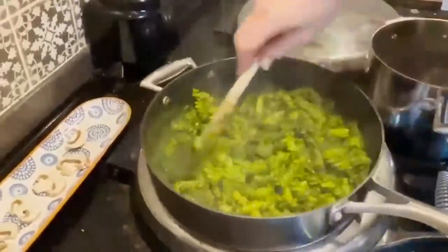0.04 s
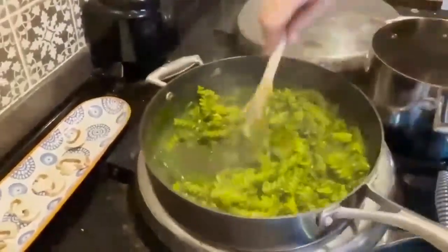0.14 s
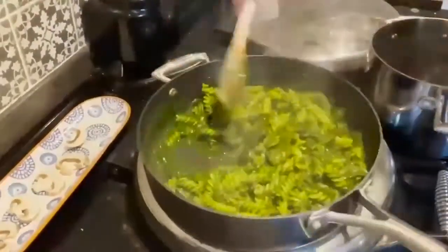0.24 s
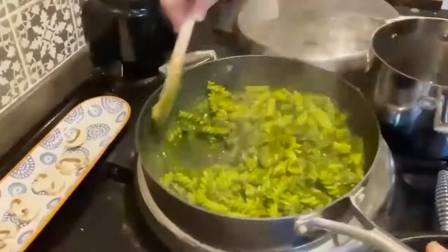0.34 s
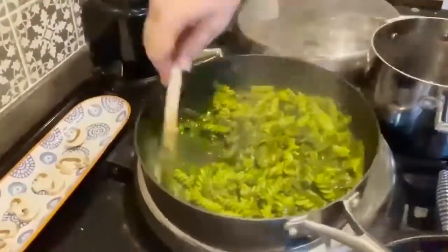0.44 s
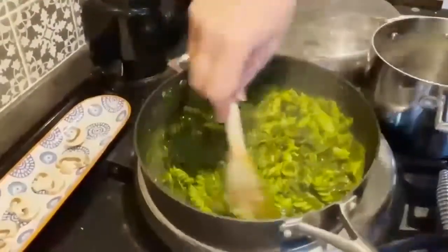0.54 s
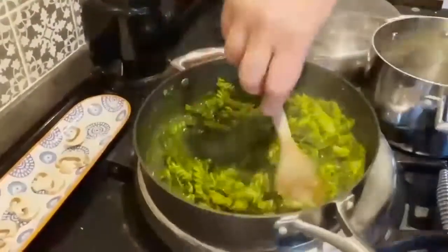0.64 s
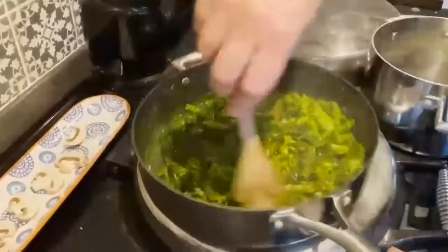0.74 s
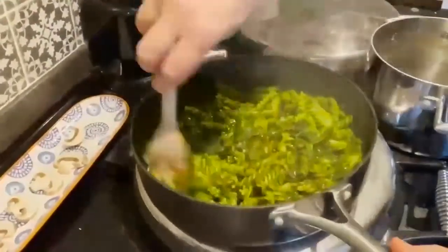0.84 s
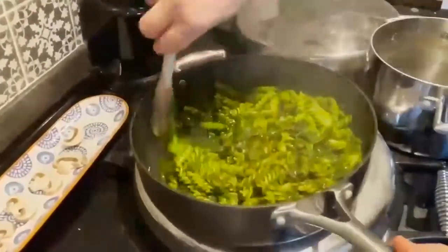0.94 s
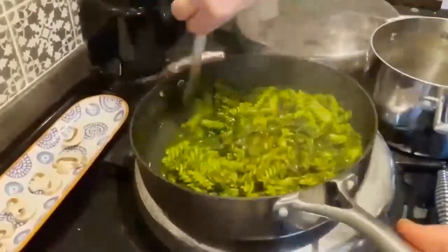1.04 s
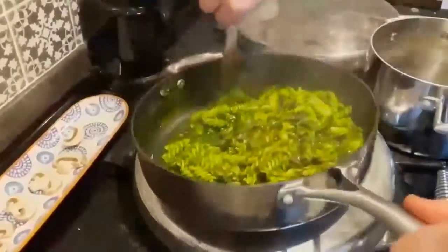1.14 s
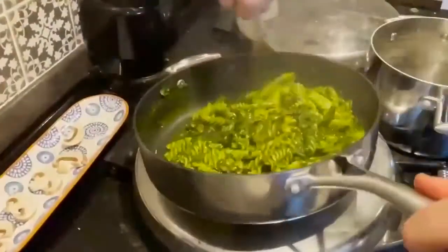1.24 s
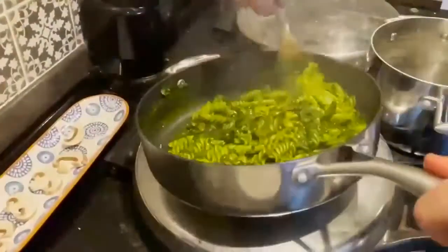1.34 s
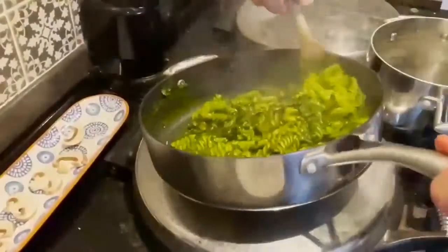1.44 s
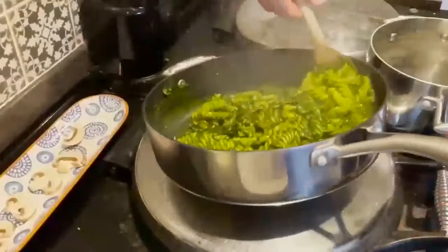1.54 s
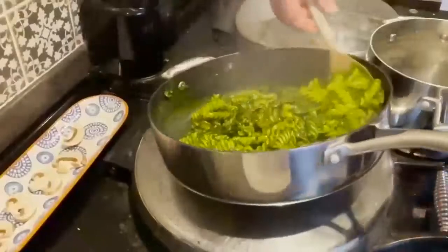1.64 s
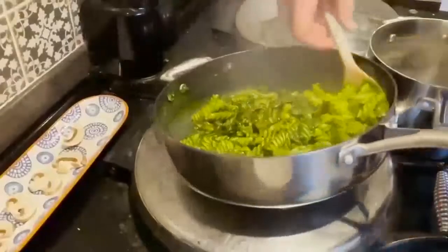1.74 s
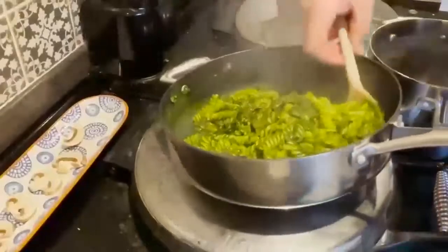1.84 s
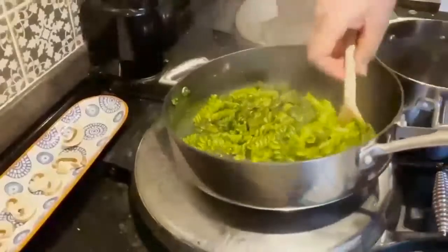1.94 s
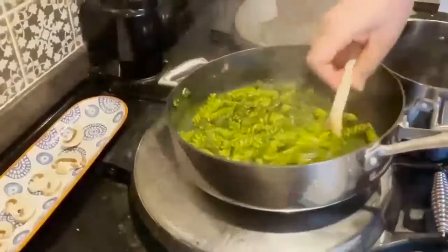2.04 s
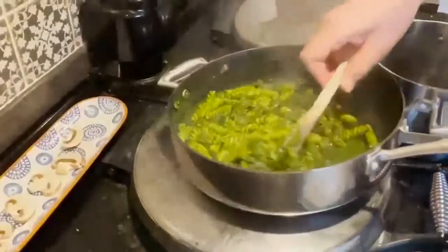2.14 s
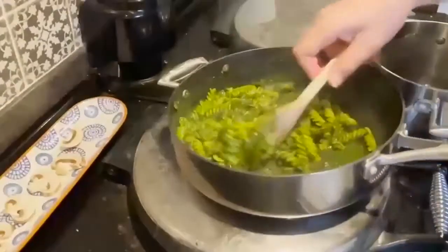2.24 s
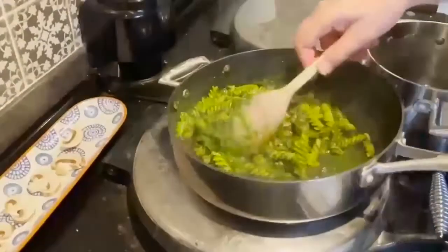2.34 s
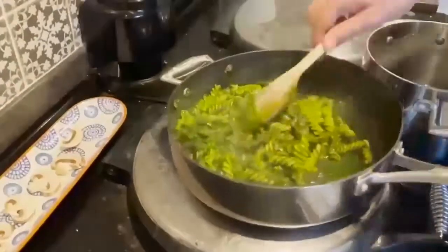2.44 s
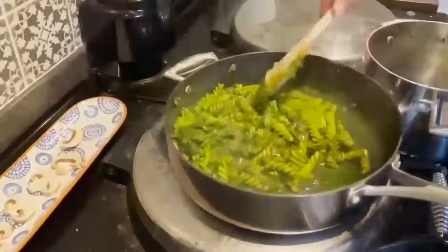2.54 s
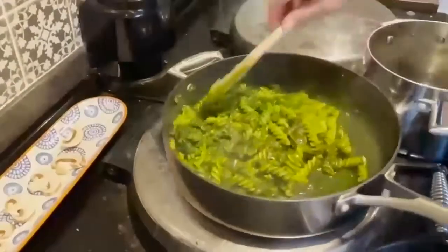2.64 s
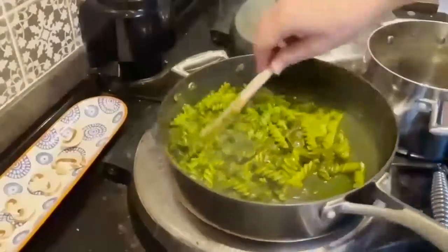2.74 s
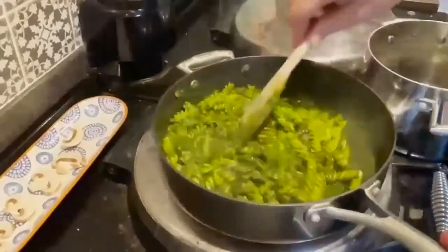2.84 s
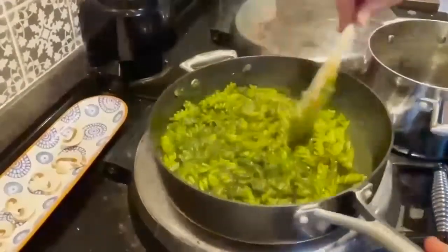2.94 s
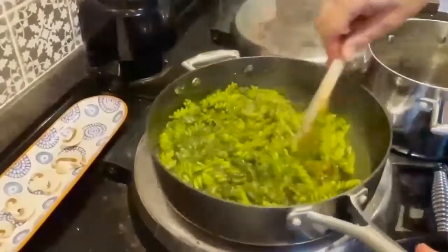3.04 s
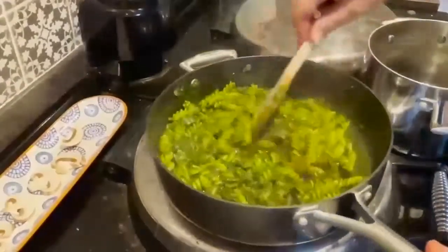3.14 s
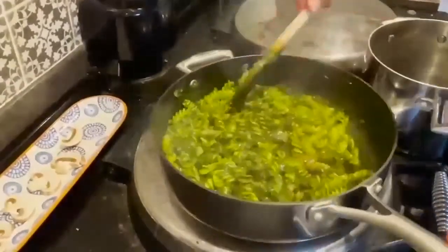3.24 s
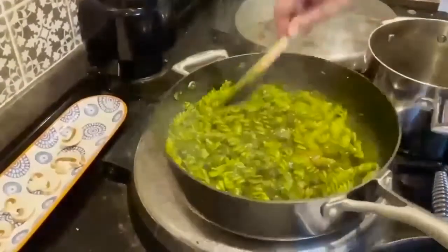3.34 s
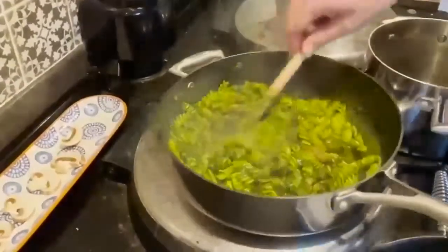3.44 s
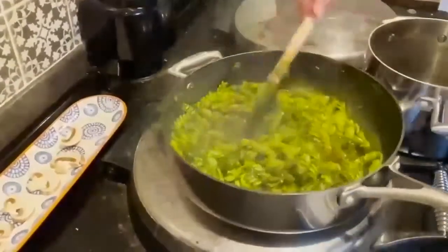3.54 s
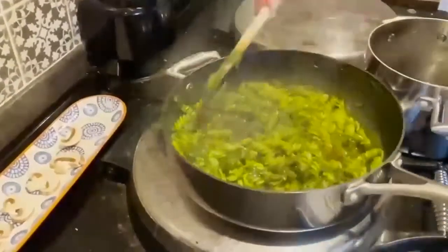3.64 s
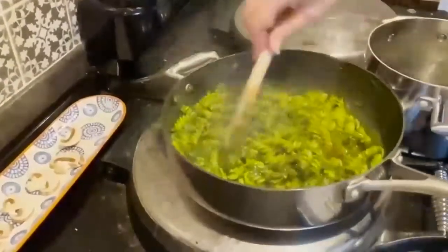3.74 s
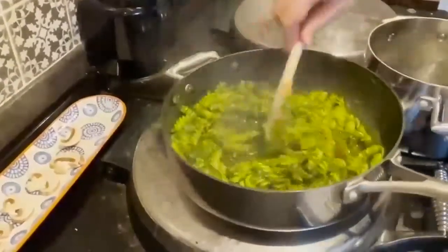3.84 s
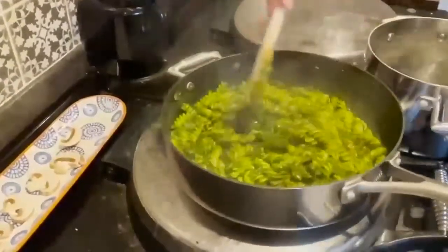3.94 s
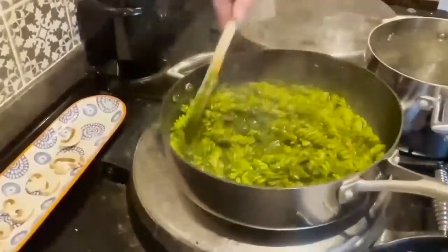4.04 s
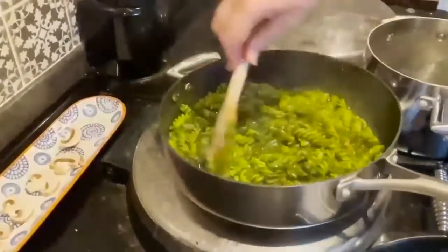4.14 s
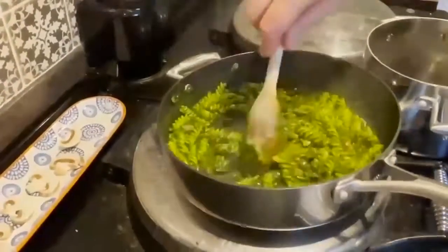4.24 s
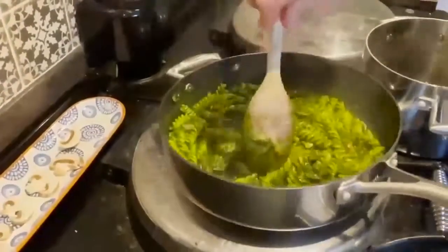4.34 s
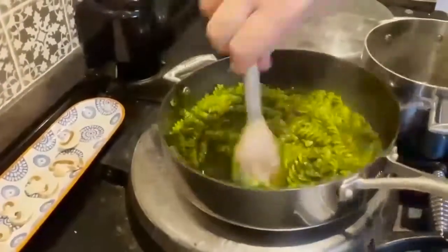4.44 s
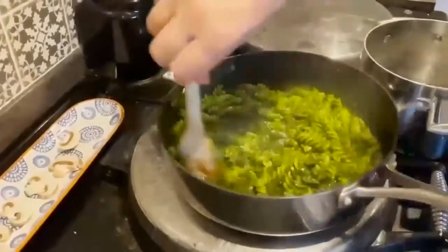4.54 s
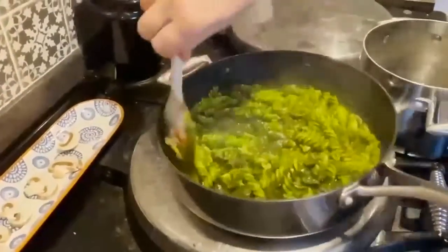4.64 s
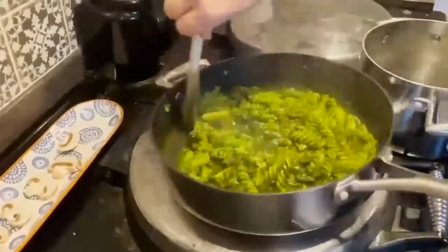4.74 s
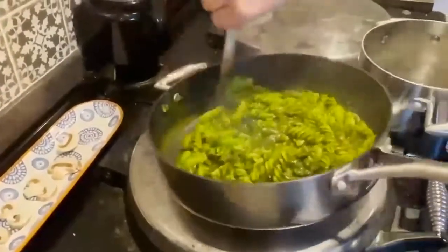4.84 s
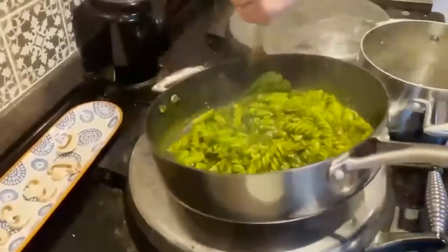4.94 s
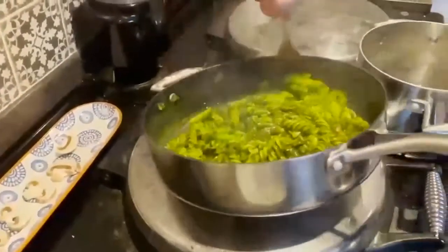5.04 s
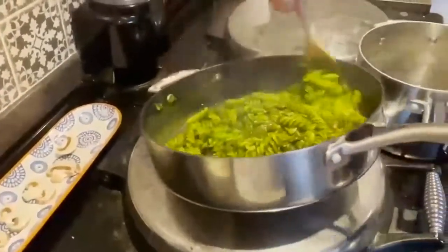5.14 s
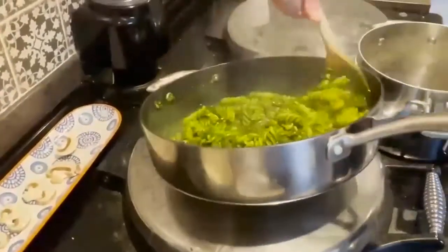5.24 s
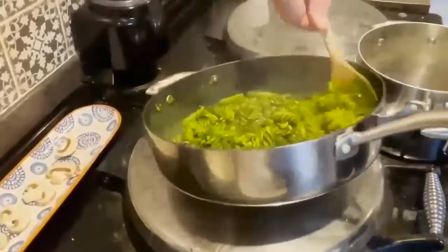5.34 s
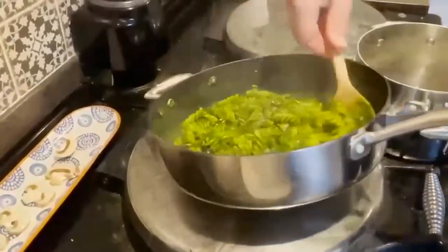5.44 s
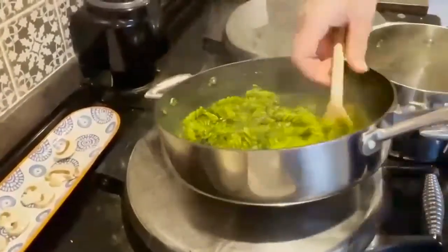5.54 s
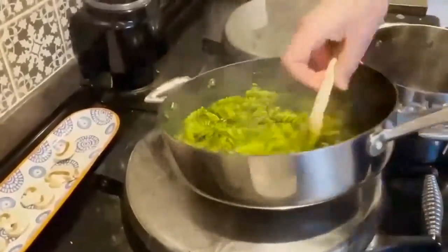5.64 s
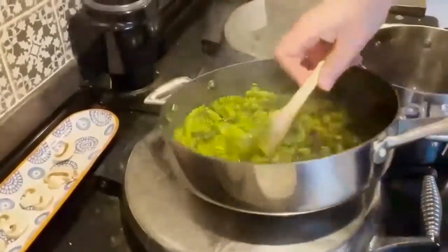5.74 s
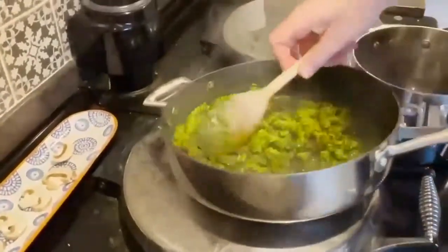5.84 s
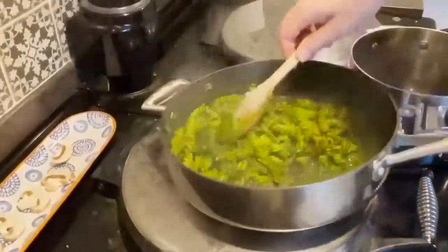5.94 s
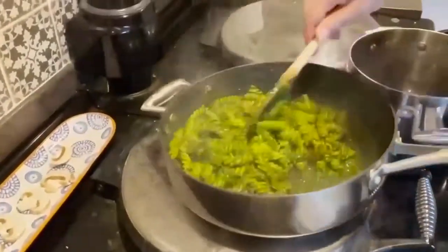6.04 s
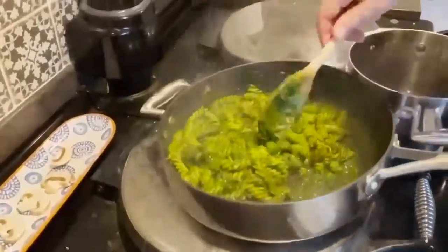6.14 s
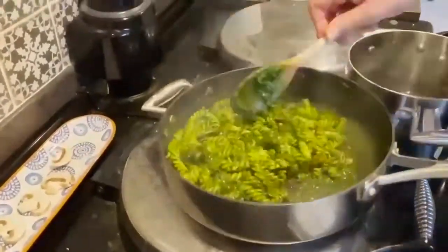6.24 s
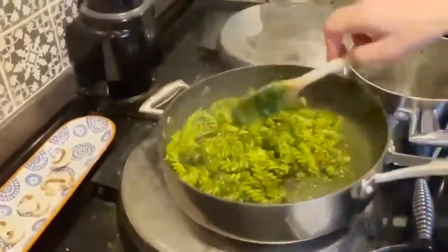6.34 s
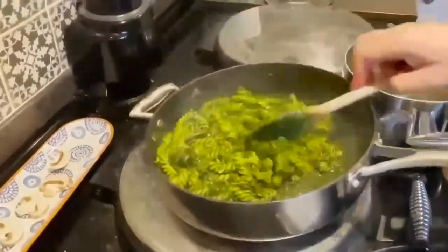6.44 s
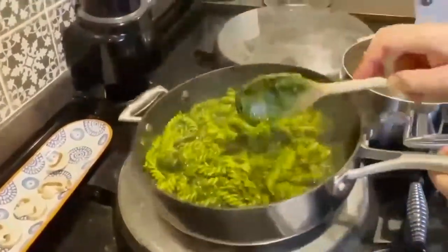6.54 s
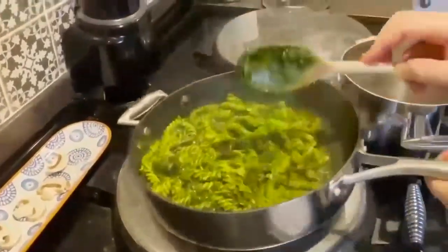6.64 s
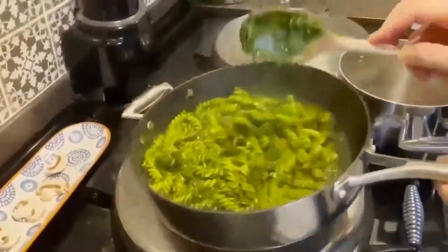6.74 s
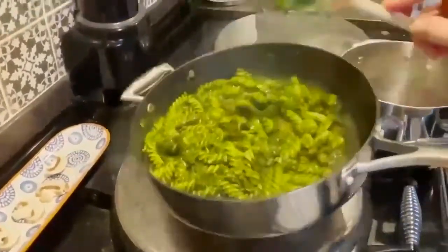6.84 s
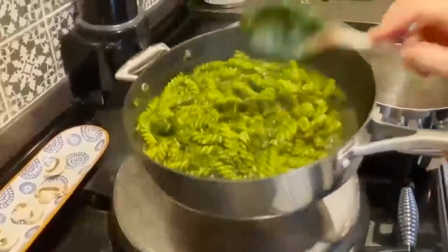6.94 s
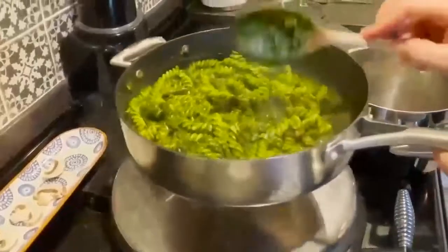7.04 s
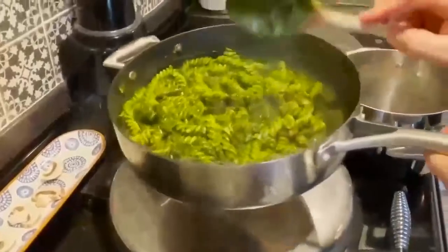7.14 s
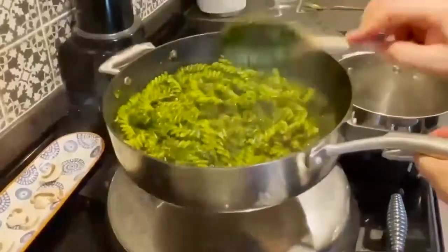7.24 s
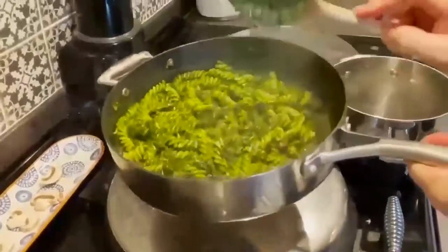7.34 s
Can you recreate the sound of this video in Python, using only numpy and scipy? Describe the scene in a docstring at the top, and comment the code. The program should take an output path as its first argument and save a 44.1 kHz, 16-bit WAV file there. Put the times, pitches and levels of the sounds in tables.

```python
"""A wooden spoon stirs sauced pasta in a steel pan: noise and damped grains make the hiss and squelch.
The spoon's scrapes are noise through the pan's modes; its knocks and two raps on the rim ring those modes.
Behind them lie grip noise of the hand on the phone, a humming appliance and the rumble of a small hard kitchen.
Two microphones a hand's width apart hear it all in stereo."""
import sys
import numpy as np
from scipy import signal
from scipy.fft import rfft, irfft, next_fast_len
from scipy.io import wavfile
from scipy.ndimage import uniform_filter1d, map_coordinates

SR = 44100
rng = np.random.default_rng(int(sys.argv[2]) if len(sys.argv) > 2 else 0)


def store_wav(level_fs):
    """Save 16-bit WAV to argv[1]."""
    pcm = np.round(np.clip(np.atleast_2d(level_fs), -1, 1) * 32767)
    wavfile.write(sys.argv[1], SR, pcm.T.astype(np.int16))


N = 325017

# Background hum of the appliance: (frequency [Hz], nominal rms level [dB])
HUM_PARTIALS = [(49.4, -43.5), (98.8, -67)]
# Spectrum of the kitchen rumble: (frequency [Hz], relative level [dB])
AIR_SPECTRUM = [(35, -1.5), (60, 1.5), (78, -6), (102, -22), (141, -14.5), (235, -11), (706, -36),
                (2000, -32.5), (4400, -120)]
# Likeness of left and right in diffuse sound: (frequency [Hz], correlation [1])
STEREO_LIKENESS = [(60, 0.71), (200, 0.68), (640, 0.022), (3000, 0.014), (6500, 0.47), (9000, 1),
                   (15000, 0.91)]
# Reverberation of the kitchen: (frequency [Hz], time to fall 60 dB [s])
ROOM_DECAY = [(150, 0.35), (1000, 0.48), (4000, 0.35), (12000, 0.058)]

# Grip noise of the hand on the phone: (time [s], nominal rumble level [dB])
GRIP_LEVELS = [(0.0, -58.5), (0.3, -67.5), (1.17, -70), (2.05, -53.5), (2.4, -76), (4.2, -59.5),
               (4.4, -51.5), (4.65, -59), (5.3, -59.5), (6.3, -58), (7.37, -62.5)]
# Jolts of the case by the hand: (start [s], rise [s], hold [s], nominal rumble level [dB])
CASE_JOLTS = [(5.416, 0.0073, 0.0074, -47), (5.57, 0.026, 0.0077, -42.5), (5.756, 0.023, 0.022, -33),
              (5.824, 0.014, 0.042, -30.5), (5.895, 0.0074, 0.079, -46), (6.133, 0.0078, 0.023, -42)]
# A finger sliding over the case: (start [s], rise [s], hold [s], nominal level [dB])
FINGER_RUBS = [(5.81, 0.029, 0.0055, -41.5)]
# Spectrum of the grip noise: (frequency [Hz], relative level [dB])
GRIP_SPECTRUM = [(24, -71), (40, -4), (75, 8.5), (281, -8), (368, -13.5), (589, -23), (1200, -82)]
# Rocking of the case in the hand: (frequency [Hz], width [Hz], relative level [dB])
CASE_MODES = [(68.9, 7.9, 6)]

# Blows of spoon on pan: (time [s], clack peak before stereo balance [dB], thud near 200 Hz [dB],
# body near 450 Hz [dB], edge above 1.6 kHz [dB], room [dB], share of free ring time left by the food [1])
SPOON_KNOCKS = [(0.2, -50.5, -9, -29, -5, -4, 0.27), (0.363, -70, 24, 15, -5, 1, 0.34),
                (1.013, -32.5, -10.5, 5, -3.5, -5.5, 0.41), (1.135, -39.5, 3.5, 4, 2.5, -2.5, 0.54),
                (1.306, -54.5, 9, 10, -16, 2, 0.21), (2.701, -51, -1, 5.5, 5, -6, 0.49),
                (3.353, -24, -54, 9, -16.5, -7.5, 0.32), (3.761, -47, -8, 21.5, -22, -4.5, 0.27),
                (4.115, -49, 9, -31, 28, -8.5, 0.18), (4.415, -22, -20, 2, 15, -10, 0.25),
                (4.423, -39, 5.5, 15, 7, -4.5, 0.6), (4.705, -26, -13.5, 1.5, -3.5, -5.5, 0.42),
                (5.59, -60.5, 13, 17.5, -16, -9, 0.69), (5.75, -34, -1, -4.5, -23, -7, 0.34),
                (5.81, -29.5, -12, -13, 3.5, -14, 0.57), (5.832, -29.5, 0, 0, -10, -15.5, 0.54),
                (6.144, -59.5, 13, 18, 15, 0.5, 0.36), (6.949, -11, -10.5, -7, -4.5, -5.5, 0.26),
                (6.9599, -16, -17.5, -17.5, -16, -6.5, 0.61), (7.173, -9, -7, -10, -4.5, -7, 0.23),
                (7.1826, -16, -15, -14, -19, -5.5, 0.83)]
# Modes of the steel pan: (frequency [Hz], relative level [dB], free time to fall 60 dB [s])
PAN_MODES = [(206.6, 5.5, 0.32), (347.6, 6.5, 0.17), (470, 5.5, 0.11), (546, 3, 0.13), (673, 0, 0.14),
             (822, -1, 0.12), (933, 1, 0.12), (1077, 0, 0.11), (1146, -4.5, 0.26), (1262, -4.5, 0.29),
             (1349, -14, 0.32), (1437, -10, 0.15), (1620, -9.5, 0.38), (1841, -12.5, 0.33),
             (2053, -16, 0.33), (2203, -13, 0.32), (3300, -20.5, 0.25), (3957, -22.5, 0.2),
             (4140, -29, 0.2)]
# Modes of the wooden spoon: (frequency [Hz], width [Hz], relative level [dB])
SPOON_MODES = [(560, 115, -6), (1213, 247, 7), (1847, 101, 18), (3145, 730, 14.5), (4220, 490, 13.5),
               (5060, 1250, 7.5)]
# Single pan modes that sing under a firm drag: (start [s], hold [s], nominal level [dB], pitch [Hz])
STEEL_SINGS = [(0.837, .09, -53, 925), (0.88, 0.11, -54, 1444), (0.87, 0.13, -51.5, 1820),
               (1.165, 0.095, -57.5, 1740), (1.33, 0.1, -62, 1060), (1.787, 0.11, -68.5, 1130),
               (4.63, 0.072, -52.5, 1845)]

# Spoon strokes through the food:
# (start [s], rise [s], hold [s], nominal hiss [dB], nominal squelch [dB], nominal scrape [dB])
SPOON_STROKES = [(0.0, 0.00095, 0.11, -63, -63, -66.5), (0.354, 0.021, 0.012, -59, -66, -60.5),
                 (0.437, 0.059, 0.035, -57.5, -58, -54), (0.683, 0.094, 0.031, -57.5, -57, -54.5),
                 (0.826, 0.031, 0.084, -58.5, -56.5, -56.5), (1.04, 0.1, 0.022, -59, -60.5, -61),
                 (1.238, 0.016, 0.028, -61, -61, -56.5), (1.323, 0.023, 0.43, -70.5, -78, -61),
                 (1.878, 0.039, 0.5, -71.5, -78.5, -75), (2.651, 0.0088, 0.11, -63, -60, -65),
                 (2.963, 0.01, 0.11, -65.5, -62.5, -67), (3.316, 0.022, 0.09, -64, -56, -57),
                 (3.721, 0.0056, 0.053, -57, -54, -64.5), (4.1, 0.021, 0.012, -57, -54.5, -58),
                 (4.177, 0.073, 0.14, -68, -72.5, -59), (4.401, 0.0059, 0.33, -58.5, -59, -55),
                 (4.8, 0.021, 0.18, -73.5, -76, -62), (5.046, 0.056, 0.14, -65, -68, -58.5),
                 (5.277, 0.053, 0.28, -66, -71.5, -63), (5.676, 0.018, 0.1, -61.5, -69, -62),
                 (5.782, 0.022, 0.013, -50.5, -47, -56.5), (5.94, 0.034, 0.28, -60.5, -67, -66),
                 (6.323, 0.031, 0.11, -60.5, -62.5, -57), (6.41, 0.013, 0.27, -70.5, -70.5, -65)]
# Wet pops of the food: (time [s], nominal size of first bubble [dB], its pitch [Hz])
WET_POPS = [(0.377, -37, 4270), (0.5338, -36, 3000), (0.629, -38.5, 2340), (1.163, -21.5, 8450),
            (1.1776, -33.5, 3030), (1.266, -42, 2980), (1.6587, -43.5, 3240), (2.1805, -50, 2130),
            (2.2137, -48, 1850), (2.2783, -47, 2590), (2.434, -39.5, 2800), (2.4813, -45, 4170),
            (2.658, -37.5, 2410), (2.682, -38.5, 2580), (2.724, -38, 2630), (2.7657, -32.5, 3770),
            (2.812, -50, 1860), (2.796, -42, 4320), (2.845, -38.5, 2780), (2.974, -53, 1590),
            (3.009, -36, 2300), (3.028, -32.5, 1860), (3.093, -40.5, 2720), (3.111, -35, 3330),
            (3.411, -48, 3900), (3.734, -24, 4770), (5.69, -40, 2420), (5.852, -41, 3200),
            (5.8833, -33, 5040), (6.3529, -30, 3900)]
# Fine spits of sauce: (time [s], nominal level [dB], pitch [Hz])
SAUCE_TICKS = [(0.152, -58, 10500), (1.65, -49, 12900), (3.4602, -49.5, 9000)]
# Spectrum of the steam: (frequency [Hz], relative level [dB])
HISS_SPECTRUM = [(880, -66.5), (1500, -8), (1720, -52), (1880, 8), (2910, -19.5), (3450, 5.5), (4120, 7.5),
                 (5540, 2), (6180, 8.5), (7460, 2.5), (13500, -1), (16000, -9)]

TOP_HZ = 15800  # band limit of the phone
LAG_S = 0.00007  # direct sound reaches the right microphone this much later
RISE_DB = 13  # climbed by a gesture during its rise
HISS_FALL, SQUELCH_FALL, SCRAPE_FALL = 118, 270, 61  # after a stroke, dB per s
GRIP_FALL, RUB_FALL, SING_FALL = 200, 550, 520  # after a jolt, a rub or a singing drag, dB per s
BUILD_CYCLES = 1  # time constant of a mode's build-up, in cycles
SCATTER_DB = 1.5  # standard deviation of each mode's level from blow to blow
WANDER = 0.8  # phase flutter that roughens a ring: radians for a mode at 1800 Hz
EDGE_GROWS = 1.47  # factor on the edge dB at 5 kHz: a hard knock's edge gains, a soft one's fades
REBOUND_S, REBOUND_DB = 0.0026, -8  # the spoon touches a second time
JAR_DB, JAR_HZ, JAR_S = -13, 86.5, 0.0063  # worktop thud: dB under peak plus thud, pitch, swell time
SING_RISE_S, SING_WAVER, SING_GRIT = 0.02, 0.03, 170  # rise; pitch scatter as a share; stutter knots per s
HISS_REST_DB, SQUELCH_REST_DB = -79.5, -83  # nominal levels of the food left alone
SHAKE_HISS_DB, SHAKE_FALL = -42.5, 253  # steam shaken loose by a knock: dB re its peak; dB per s
TICK_GAIN_DB = 15  # level of the ticks above their nominal dB, before the soft start
WET_ROOM_DB = -12  # the kitchen's answer to the food


def amp(db):
    """Decibel law: level to amplitude ratio."""
    return 10 ** (np.asarray(db) / 20)


def unit(x):
    """Normalization to unit rms."""
    return x / np.sqrt(np.mean(x ** 2) + 1e-20)


def along(points, hz):
    """Linear interpolation of (frequency, value) points on a logarithmic frequency axis."""
    f, v = np.transpose(points)
    return np.interp(np.log(hz + 1), np.log(f + 1), v)


def curves(rows):
    """Linear interpolation in time of each level column; minus infinity, or silence, outside."""
    s, *cols = np.transpose(rows)
    return [np.interp(np.arange(N) / SR, s, c, -np.inf, -np.inf) for c in cols]


def wobble(rate):
    """Band-limited fluctuation: a smooth random curve through rate knots a second."""
    knots = rng.standard_normal(int(N * rate / SR) + 4)
    return map_coordinates(knots, [np.arange(N) * rate / SR])


def swells(start, rise, hold, db, fall):
    """Envelopes that rise, hold and fall exponentially; overlapping ones add in power."""
    clock = np.arange(0, N / SR + 0.002, 0.001)
    t = clock[:, None] - start
    climb_db = RISE_DB * np.clip(1 - t / np.abs(rise), 0, None)
    drop_db = fall * np.clip(t - rise - hold, 0, None)
    gain = np.linalg.norm(amp(db - climb_db - drop_db), axis=1)
    return np.interp(np.arange(N) / SR, clock, gain)


def filtered(x, response):
    """Linear filtering: the spectrum of x times a complex frequency response."""
    m = next_fast_len(x.shape[-1] + SR // 4)
    spectrum = rfft(x, m) * response(np.fft.rfftfreq(m, 1 / SR))
    return irfft(spectrum, m)[..., :x.shape[-1]]


def resonances(table):
    """Modal superposition: causal second-order resonances of alternating sign."""
    def response(f):
        return sum((-1) ** k * amp(db) * 1j * f * width / (hz * hz - f * f + 1j * f * width)
                   for k, (hz, width, db) in enumerate(table))
    return response


def rush(gain, patchy_db):
    """Diffuse field: stereo noise of unit rms, patchy in time and frequency, with a set correlation."""
    z = signal.stft(rng.standard_normal((2, N)), nperseg=512)[2]
    field = uniform_filter1d(rng.standard_normal(z.shape[1:]), 8, 0)
    field = uniform_filter1d(field, 6, 1)
    pair = signal.istft(z * amp(patchy_db * unit(field)), nperseg=512)[1][:, :N]

    def mid_side(hz):
        # the correlation of left and right is the cosine of twice this angle
        angle = np.arccos(np.clip(along(STEREO_LIKENESS, hz), -1, 1)) / 2
        return gain(hz) * np.array([np.cos(angle), np.sin(angle)])

    mid, side = filtered(pair, mid_side)
    return unit(np.array([mid + side, mid - side]))


def grains(start, hz, cycles, gain):
    """Damped oscillation: soft-starting sines that lose 40 dB in the given cycles, summed."""
    k = np.arange(SR // 100)
    turns = k * hz[:, None] / SR
    envelope = amp(-40 * turns / cycles) * (1 - np.exp(-turns))
    wave = gain[:, None] * np.sin(2 * np.pi * turns) * envelope
    return np.bincount((start[:, None] + k).ravel(), wave.ravel(), N + len(k))[:N]


def crackle(count, centre_hz, spread, cycles, spike_db):
    """Shot noise: random grains of log-normal pitch and size, unit rms."""
    hz = np.clip(centre_hz * np.exp(spread * rng.standard_normal(count)), 300, 15000)
    size = amp(spike_db * rng.standard_normal(count).clip(-2, 2))
    return unit(grains(rng.integers(0, N, count), hz, cycles, size))


def tail():
    """Reverberation: stereo noise of unit energy a side, each frequency decaying at its own rate."""
    hz, t, z = signal.stft(rng.standard_normal((2, SR // 2)), SR, nperseg=256)
    decay = amp(-60 * t / along(ROOM_DECAY, hz)[:, None])
    answer = signal.istft(z * decay, SR, nperseg=256)[1]
    answer = answer / np.linalg.norm(answer, axis=1, keepdims=True)
    return np.pad(answer, ((0, 0), (120, 0)))  # the answer starts 120 samples late


def heard(x, left_db):
    """Arrival-time and level difference: direct sound is earlier and stronger on the left."""
    def lead(hz):
        return np.exp(1j * np.pi * hz * LAG_S * np.array([[1], [-1]]))
    return filtered(np.array([x, x]), lead) * amp([[left_db], [-left_db]])


def kitchen():
    """Steady tones and diffuse noise: a hum wavering in pitch and level over a faint rumble."""
    t = np.arange(N) / SR + 0.00016 * wobble(2.3)
    hum = sum(np.sqrt(2) * amp(db + 0.78 * wobble(4.8)) * np.sin(2 * np.pi * hz * t)
              for hz, db in HUM_PARTIALS)
    rumble = rush(lambda hz: amp(along(AIR_SPECTRUM, hz)), patchy_db=2.0)
    return hum * amp([[-1.1], [1.1]]) + amp(-61.5) * rumble


def hand():
    """Structure-borne noise: grip rumble through the case, partly correlated and stronger on the left."""
    lumps = amp(3 * np.array([wobble(40), wobble(40)]))
    shared, *own = rng.standard_normal((3, N))

    def case(hz):
        return amp(along(GRIP_SPECTRUM, hz)) * (1 + 0.66 * np.abs(resonances(CASE_MODES)(hz)))

    thumps = unit(lumps * filtered(0.79 * shared + own, case))
    grip = amp(curves(GRIP_LEVELS)[0]) + swells(*np.transpose(CASE_JOLTS), GRIP_FALL)
    rub_modes = [(14000, 1900, 1.3), (4500, 4100, 1.5)]  # (frequency [Hz], width [Hz], level [dB])
    slide = unit(filtered(rng.standard_normal(N), resonances(rub_modes)))
    rub = swells(*np.transpose(FINGER_RUBS), RUB_FALL) * amp(4.8 * wobble(90))
    return grip * amp([[3], [-2]]) * thumps + rub * slide


def pan_ring(t, colour, free):
    """Free vibration: decaying pan modes with fluttering phase, unlike in the two microphones."""
    ring = np.zeros((2, len(t)))
    for hz, level, t60 in PAN_MODES:
        phase = rng.uniform(0, 3.37) + min(hz / 900, 1.6) * rng.standard_normal((2, 1))
        flutter = np.interp(t, np.linspace(0, t[-1], 60), rng.standard_normal(60))
        flutter = WANDER * min(hz / 1800, 2) * flutter
        decay_db = 60 * t / (t60 * max(free, 0.03))
        gain = amp(colour(hz) + level + SCATTER_DB * rng.normal() - decay_db)
        build = 1 - np.exp(-t * hz / BUILD_CYCLES)
        ring += gain * np.sin(2 * np.pi * hz * t + phase + flutter) * build
    return ring


def spoon_clack(t, colour):
    """Impulse response: a short rounded push excites the wood, then a rebound; unit peak."""
    push = np.exp(-t / 0.00028) * t
    modes = [(hz, width, level + colour(hz)) for hz, width, level in SPOON_MODES]
    clack = filtered(push, resonances(modes))
    clack = clack + amp(REBOUND_DB) * np.pad(clack, (round(REBOUND_S * SR), 0))[:len(t)]
    return clack / np.abs(clack).max()


def knocks():
    """Impact excitation: each blow clacks the spoon, rings the pan, jars the worktop and fills the room."""
    clacks, rings = np.zeros(N + SR), np.zeros((2, N + 2 * SR))
    t = np.arange(SR // 2) / SR
    swell = t / JAR_S * np.exp(1 - t / JAR_S)
    for s, db, thud_db, body_db, edge_db, room_db, free in SPOON_KNOCKS:
        shape = [(200, thud_db), (450, body_db), (1250, 0.0064), (1600, edge_db), (2300, edge_db),
                 (5000, EDGE_GROWS * edge_db)]

        def colour(hz):
            return along(shape, hz)

        ring = amp(db - 8) * pan_ring(t, colour, free)
        clack = amp(db) * spoon_clack(t, colour)
        jar = amp(db + thud_db + JAR_DB) * swell * np.sin(2 * np.pi * JAR_HZ * t)
        echo = signal.fftconvolve(clack + ring, tail(), axes=1)
        first = round(s * SR)
        clacks[first:][:len(t)] += clack
        rings[:, first:][:, :len(t)] += ring + jar
        rings[:, first:][:, :echo.shape[1]] += amp(room_db) * echo
    return heard(clacks[:N], left_db=4.0) + rings[:, :N] * amp([[0.6], [-0.6]])


def stirring():
    """Common excitation: hiss, squelch and scrape gains of the strokes; knocks also shake the hiss."""
    start, rise, hold, hiss_db, squelch_db, scrape_db = np.transpose(SPOON_STROKES)
    s, db = np.transpose(SPOON_KNOCKS)[:2]
    shaken = swells(s, 0.00095, 0.002, db + SHAKE_HISS_DB, SHAKE_FALL)
    hiss = amp(HISS_REST_DB) + swells(start, rise, hold, hiss_db, HISS_FALL) + shaken
    squelch = amp(SQUELCH_REST_DB) + swells(start, rise, hold, squelch_db, SQUELCH_FALL)
    return hiss, squelch, swells(start, rise, hold, scrape_db, SCRAPE_FALL)


def singing():
    """Stick-slip friction feeds one mode: pitch strays, strength stutters unlike in the two microphones."""
    sound = np.zeros((2, N))
    for s, hold, db, hz in STEEL_SINGS:
        phase = 2 * np.pi * hz * np.cumsum(1 + SING_WAVER * wobble(25)) / SR
        stutter = np.array([wobble(SING_GRIT) * np.sin(phase) + wobble(SING_GRIT) * np.cos(phase)
                            for _ in sound])
        sound += swells(np.array([s]), SING_RISE_S, hold, db, SING_FALL) * stutter
    return sound


def scrape():
    """Friction noise: the dragging spoon excites the damped modes of the steel."""
    # half the modes' dB: the pan colours a scrape less than a knock
    pan = resonances([(hz, 25 + 0.061 * hz, 0.5 * db) for hz, db, _ in PAN_MODES])
    rough = rush(lambda hz: np.abs(pan(hz)), patchy_db=3.5)
    return singing() + stirring()[2] * amp(2.5 * wobble(14)) * rough


def pops():
    """Bubble resonance: a first bubble, a quick run of mostly smaller ones, and the puff of steam freed."""
    s, db, hz = np.transpose(WET_POPS)[:, :, None]
    order = np.arange(10)
    later = order > 0  # the first bubble keeps its given time, pitch and size
    delay = np.cumsum(rng.exponential(0.0019, (len(WET_POPS), 10)) * later, axis=1)
    pitch = hz * np.exp(0.23 * rng.standard_normal(delay.shape) * later)
    size = amp(db - 2.53 * order + 3.5 * rng.standard_normal(delay.shape) * later)
    start = ((s + delay) * SR).astype(int)
    bubbles = grains(start.ravel(), pitch.ravel().clip(300, 15000), 12.3, size.ravel())
    puffs = np.bincount((s[:, 0] * SR).astype(int), amp(db[:, 0] - 34.0), N)
    puff_decay = amp(-60 * np.arange(SR // 10) / SR / 0.05)  # 60 dB in 0.05 s
    return bubbles, np.convolve(puffs, puff_decay)[:N]


def food():
    """Turbulence and bubble resonance: steam hisses, sauce films tear and bubbles burst under the spoon."""
    hissing, squelching, _ = stirring()
    bubbles, puffs = pops()
    steam = rush(lambda hz: amp(along(HISS_SPECTRUM, hz)), patchy_db=3.5)
    spit = crackle(count=4000, centre_hz=8650, spread=0.41, cycles=0.8, spike_db=2.5)
    flicker = amp(0.2 * wobble(33) + 2.34 * wobble(70))
    hiss = (hissing * flicker + puffs) * (steam + 0.4 * spit)
    films = crackle(count=5500, centre_hz=3100, spread=0.4, cycles=9, spike_db=4)
    squelch = squelching * amp(3 * wobble(40)) * films
    s, db, hz = np.transpose(SAUCE_TICKS)
    ticks = grains((s * SR).astype(int), hz.clip(300, 15000), 12.0, amp(db + TICK_GAIN_DB))
    wet = squelch + bubbles
    room = signal.fftconvolve(wet[None], tail(), axes=1)[:, :N]
    return hiss + ticks + heard(wet, left_db=2.0) + amp(WET_ROOM_DB) * room


def scene():
    """Linear superposition of all sources at the two microphones."""
    return kitchen() + hand() + knocks() + scrape() + food()


def record(dry):
    """Band limitation: the phone keeps nothing at or above its band limit."""
    return filtered(dry, lambda hz: hz < TOP_HZ)


dry = scene()
out = record(dry)
store_wav(out)
```